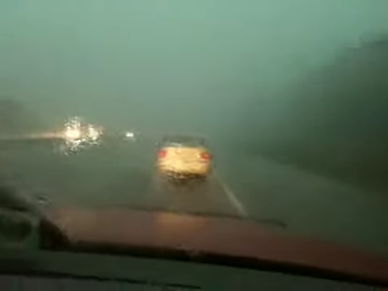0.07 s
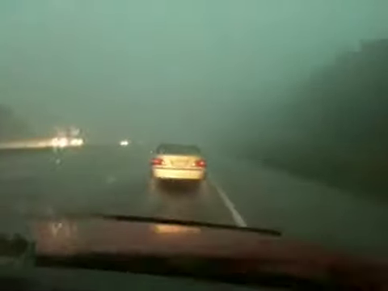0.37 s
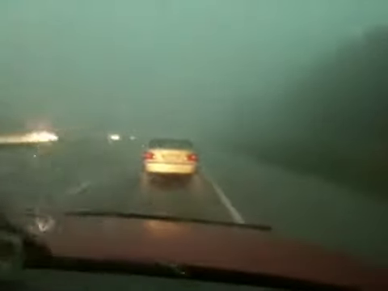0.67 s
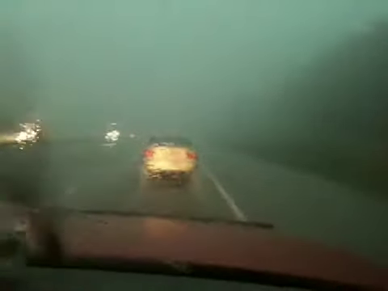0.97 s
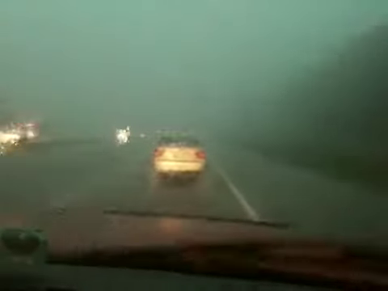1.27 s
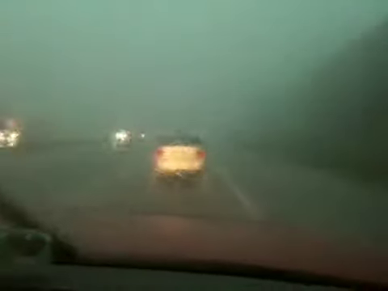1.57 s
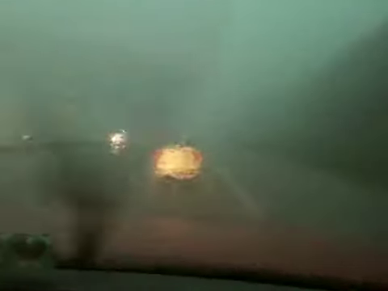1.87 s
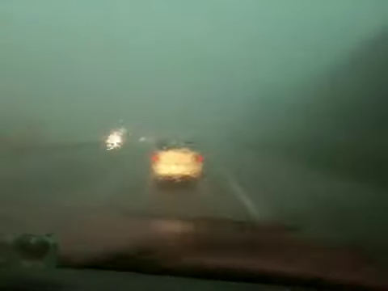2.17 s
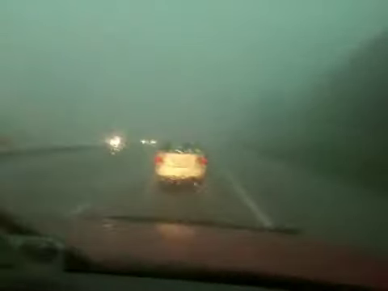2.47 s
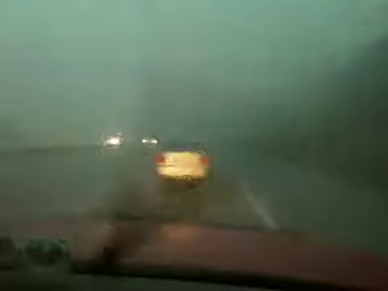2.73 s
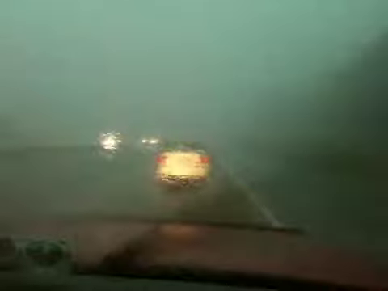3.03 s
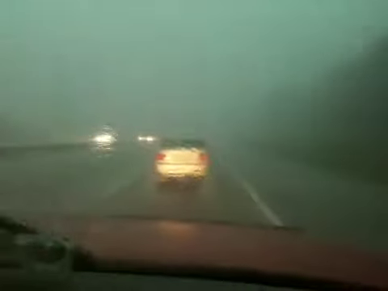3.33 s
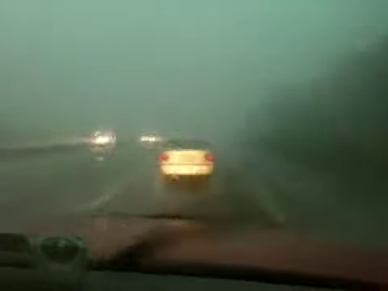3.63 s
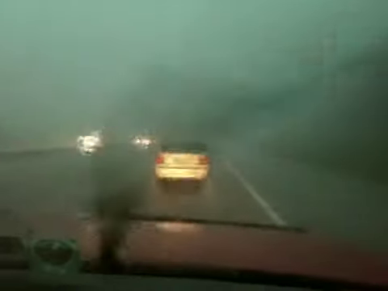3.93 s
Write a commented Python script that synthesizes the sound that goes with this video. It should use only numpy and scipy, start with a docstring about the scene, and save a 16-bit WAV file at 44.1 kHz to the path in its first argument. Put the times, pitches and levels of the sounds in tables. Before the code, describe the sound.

Windshield wipers clack loudly inside a moving car at about 0.4, 1.3, 2.1, 3.0 and 3.8 seconds. Each clack comes with a hollow thump and a brief shudder of dull knocks, then a faint bump half a second later. Quieter rain hisses and patters on the glass and body throughout, swelling and easing, with a few bigger drops ticking. A low rumble of tires and wind runs underneath.

```python
"""Windscreen wipers clack every 0.84 s, heard inside a car driving through a downpour.
The cause is backlash: at the bottom of each sweep the loose linkage takes up its slack in an impact,
the cowl booms in its resonant modes and the blades shudder back; at the top they turn with a faint bump.
Rain, a mass of random impacts, hisses and ticks on the glass and patters on the body.
Underneath, tyres and wind send a low rumble through the body."""
import sys
import numpy as np
from scipy import signal
from scipy.fft import rfft, irfft
from scipy.io import wavfile
from scipy.ndimage import uniform_filter1d

SR = 44100
rng = np.random.default_rng(int(sys.argv[2]) if len(sys.argv) > 2 else 0)


def int16_out(signal):
    """Quantize to a 16-bit WAV file."""
    q = np.round(np.clip(np.atleast_2d(signal).T, -1, 1) * 32767)
    wavfile.write(sys.argv[1], SR, q.astype(np.int16))


N = 176400

# Wiper strokes, timed at the clack: start_s, level_db
STROKE_TIMES = [(-.39, 0), (0.4483, 1.5), (1.2875, 2), (2.1279, 1.5), (2.9653, 1.5), (3.804, 1)]
def wipers():
    """Superposition: the impacts, friction and resonances of each stroke add up."""
    return linkage() + scrape() + clack() + housing() + cowl() + blades()


# Knocks around each clack, the last two at the top of the sweep: offset_s, level_db, bass_db, treble_db
KNOCK_PATTERN = [(-.0185, -4.5, 6, -12.5), (-.0115, 0, 5.5, 6), (-.0075, 1, -8, -2.5), (.002, -3, 3, 2),
                 (.014, -6, -2, 2), (0.0251, -5.5, -2.5, -13), (0.0347, -3, 4, 0), (0.046, -12, 6, 4.5),
                 (0.0619, -3, -8, -1.5), (.071, -7, 8, 3), (.082, -7, -4.5, -11), (.120, -8.5, 4, -22),
                 (.137, -5.5, -2, 0), (.1445, -2.5, -4.5, -18), (.156, -11, 4, -9), (0.197, -10, -3, -14),
                 (.206, -6, -5, -13), (.281, -7.5, -4, -5), (.292, -10, -2, 6.5), (.535, -12.5, -3, -15),
                 (0.548, -16, 1, -5)]
# Spectrum of a knock: frequency_hz, level_db
KNOCK_SPECTRUM = [(30, -36), (70, -26), (110, -2.5), (160, 0), (210, -5.5), (290, 3), (360, -1.5),
                  (530, 1.5), (680, -2), (850, -12), (1100, -13.5), (1600, -8), (2000, -13), (3000, -26),
                  (5000, -31), (9000, -41), (14000, -60)]
def linkage(level_db=20.5, variation=0.41):
    """Repeated impact: the arms reverse and the blades shudder in dull knocks, alike at each stroke."""
    out = np.zeros(N)
    for offset_s, knock_db, bass_db, treble_db in KNOCK_PATTERN:
        common = knock_ring()
        for start_s, stroke_db in STROKE_TIMES:
            ring = np.sqrt(1 - variation ** 2) * common + variation * knock_ring()
            knock = colour(ring, KNOCK_SPECTRUM, bass_db, treble_db)
            add(out, start_s + offset_s, amp(level_db + knock_db + stroke_db) * knock)
    return out


# Decay of a knock by band: frequency_hz, t60_s
KNOCK_DECAY = [(100, 0.093), (500, 0.0683), (1500, 0.064), (8000, 0.055)]
def knock_ring():
    """Frequency-dependent damping: the higher bands of a knock die sooner."""
    spectra = [rfft(burst(t60_s)) for _, t60_s in KNOCK_DECAY]
    hz = np.linspace(0, SR / 2, len(spectra[0]))
    centres = [centre for centre, _ in KNOCK_DECAY]
    nearness = [log_interp([(f, float(f == centre)) for f in centres], hz) for centre in centres]
    bands = [spectrum * (near == np.max(nearness, 0)) for spectrum, near in zip(spectra, nearness)]
    return irfft(sum(bands))[:len(hz)]


# The clack and its two reflections: offset_s, level_db
CLACK_REFLECTIONS = [(0, 1.5), (.0037, -11), (.0095, -8)]
# Spectrum of the clack and the scrape: frequency_hz, level_db
CLACK_SPECTRUM = [(30, -21), (80, -17), (160, -13), (210, -10), (300, -2), (450, -0.5), (700, -1.5),
                  (1100, -9), (1700, -3), (2250, -5.5), (2700, 0.5), (3300, -4.5), (4500, -4), (5400, -9.5),
                  (7800, -6), (10500, -14), (13000, -26.5), (16000, -50)]
def clack(level_db=13.5, tail_db=-4.5):
    """Backlash: the slack closes with a hard crack, echoed twice off the cabin; reflections add a tail."""
    out = np.zeros(N)
    for offset_s, impact_db in CLACK_REFLECTIONS:
        crack = burst(t60_s=0.014)
        for start_s, stroke_db in STROKE_TIMES:
            tail = amp(tail_db) * burst(t60_s=0.062)
            impact = colour(crack + tail, CLACK_SPECTRUM)
            add(out, start_s + offset_s, amp(level_db + impact_db + stroke_db) * impact)
    return out


def scrape(length_s=0.015, level_db=-22, rise_db=7):
    """Sliding friction: the loose joint rasps through its slack, growing louder up to the clack."""
    out = np.zeros(N)
    progress = np.arange(SR // 20) / SR / length_s
    swell = (progress < 1) * amp(rise_db * (np.minimum(progress, 1) - 1.5))
    for start_s, stroke_db in STROKE_TIMES:
        rasp = colour(rng.standard_normal(len(swell)) * swell, CLACK_SPECTRUM)
        add(out, start_s - length_s, amp(level_db + stroke_db) * rasp)
    return out


# Modes of the linkage housing: pitch_hz, level_db, t60_s
HOUSING_MODES = [(1573, -22.5, 0.052), (1933, -19.5, 0.055), (2135, -24, 0.06), (2595, -20, 0.047),
                 (2770, -31, 0.053)]
def housing():
    """Impulse response: the clack rings the hollow housing."""
    return stroke_resonance(HOUSING_MODES, offset_s=0, rise_s=0.00044)


# Modes of cowl and cabin: pitch_hz, level_db, t60_s
COWL_MODES = [(161.1, -18.5, 0.39), (247, -19, 0.21), (288, -21.5, 0.21), (495, -26.5, 0.16),
              (609, -29.5, 0.33), (780, -35, 0.35), (1540, -40, 0.28), (1990, -28.5, 0.13),
              (2550, -46, .12)]
def cowl():
    """Resonance: the reversal at the bottom of the sweep sets cowl and cabin booming."""
    return stroke_resonance(COWL_MODES, offset_s=-0.012, rise_s=0.012)


# Modes of the wiper arms: pitch_hz, level_db, t60_s
ARM_MODES = [(372, -26, 0.12), (436.5, -30, 0.14), (522, -21, 0.11), (627, -31.5, 0.091),
             (805, -29.5, 0.16), (915, -30.5, 0.13), (1248, -26.5, 0.08), (1580, -38, .12)]
def blades():
    """Free vibration: the arms ring as the blades flop over to start back up."""
    return stroke_resonance(ARM_MODES, offset_s=0.1395, rise_s=0.0042)


# Strength of the rain: time_s, hiss_db, patter_db
RAIN_STRENGTH = [(0, -37, -32.5), (0.141, -40, -35), (.38, -50.5, -42), (.6, -53.5, -46.5),
                 (.74, -39, -37.5), (.98, -42, -39), (1.12, -39, -34.5), (1.42, -41.5, -38),
                 (1.72, -35, -32), (1.96, -39.5, -36.5), (2.1, -39.5, -37), (2.56, -43, -39),
                 (2.92, -38, -35), (3.1, -41, -37), (3.36, -47.5, -42), (3.56, -41, -37.5),
                 (3.76, -45, -40), (4, -44.5, -38.5)]
# Spectrum of rain on the glass: frequency_hz, level_db
GLASS_SPECTRUM = [(1000, -17.5), (2200, -0.5), (3300, 1), (4200, -1.5), (5100, -4), (6000, 0), (6800, 2),
                  (8000, -1), (10300, -2), (12000, -7.5), (14000, -19), (15800, -59)]
# Spectrum of rain on the body: frequency_hz, level_db
BODY_SPECTRUM = [(200, -19.5), (500, -0.5), (650, 4), (800, -2), (1050, -0.5), (1250, 1), (1580, 2.5),
                 (2100, 0), (2600, -6.5), (4000, -12.5), (9000, -37)]
# Single big drops on the glass: start_s, level_db
BIG_DROPS = [(.160, -5), (0.264, -5), (0.492, -5), (.558, -2.5), (.613, -9), (.961, -6), (1.0368, -3.5),
             (1.0848, -1), (2.343, -4), (2.715, -5), (3.122, -4)]
def rain(noise_db=1, ticks_db=-6.5, splats_db=-2.5):
    """Incoherent addition: impacts merge into noise that swells and eases; a few big drops stand out."""
    time_s, hiss_db, patter_db = np.transpose(RAIN_STRENGTH)
    t = np.arange(N) / SR
    hiss = amp(noise_db) * drifting_noise(GLASS_SPECTRUM, patch_db=1.2, flicker_db=1.5)
    glass = hiss + amp(ticks_db) * small_drops()
    body = amp(noise_db) * drifting_noise(BODY_SPECTRUM, patch_db=1.2, flicker_db=0.5)
    out = glass * amp(np.interp(t, time_s, hiss_db)) + body * amp(np.interp(t, time_s, patter_db))
    for start_s, drop_db in BIG_DROPS:
        add(out, start_s, amp(splats_db + drop_db) * colour(burst(t60_s=0.029), GLASS_SPECTRUM))
    return out


def small_drops(spots=16, drops_per_s=1000, spread_db=5):
    """Shot noise: drops tick at random times, each spot of the glass with its own ring."""
    out = np.zeros(N)
    for _ in range(spots):
        sizes = amp(spread_db * np.minimum(rng.exponential(1, N), 4.5))
        hits = sizes * (rng.random(N) < drops_per_s / spots / SR)
        out += signal.oaconvolve(hits, burst(t60_s=0.0103))[:N]
    return unit_rms(colour(out, GLASS_SPECTRUM))


# Spectrum of the road rumble: frequency_hz, level_db
ROAD_SPECTRUM = [(20, -38), (50, -37), (70, -19), (88, -8), (110, -7), (155, 1), (215, -4.5), (280, -2),
                 (340, -6.5), (420, -3.5), (500, -18), (640, -4), (780, -16), (2000, -26), (8000, -60)]
def road(level_db=-37.5):
    """Sound transmission: tyres and wind rumble through the body."""
    return amp(level_db) * drifting_noise(ROAD_SPECTRUM, patch_db=0.75, flicker_db=1.54)


def stroke_resonance(modes, offset_s, rise_s):
    """Modal synthesis: a sum of damped sines swells and rings out once in every stroke."""
    out, t = np.zeros(N), np.arange(SR // 2) / SR
    ring = sum(amp(db) * decay(t, t60_s) * np.sin(2 * np.pi * hz * t + rng.uniform(0, 2 * np.pi))
               for hz, db, t60_s in modes)
    attack = 1 - np.exp(-t / rise_s)
    for start_s, stroke_db in STROKE_TIMES:
        add(out, start_s + offset_s, amp(stroke_db) * ring * attack)
    return out


def burst(t60_s, size=8192, passes=4):
    """Modal overlap: a struck panel rings as dying noise, here with an even spectrum and energy 1."""
    t = np.arange(size) / SR
    gate = np.arange(size) < min(t60_s * SR, size / 2)
    ring = rng.standard_normal(size) * decay(t, t60_s)
    for _ in range(passes):
        spectrum = rfft(ring)
        whitened = irfft(spectrum / (abs(spectrum) + 1e-12))
        ring = whitened * decay(t, 10 * t60_s) * gate
    return ring / np.linalg.norm(ring)


def drifting_noise(spectrum, patch_db, flicker_db, size=512):
    """Amplitude modulation: patches of a noise spectrum drift while all bands flicker together."""
    hop = size // 4
    frames, bins = N // hop + 8, size // 2 + 1
    real, imag, patches = rng.standard_normal((3, frames, bins))
    patches = uniform_filter1d(patches, size=24, axis=0)
    patches = unit_rms(uniform_filter1d(patches, size=8, axis=1))
    flicker = unit_rms(uniform_filter1d(rng.standard_normal(frames), size=5))[:, None]
    spectrogram = (real + 1j * imag) * amp(patch_db * patches + flicker_db * flicker)
    noise = signal.istft(spectrogram.T, nperseg=size, noverlap=size - hop)[1]
    return unit_rms(colour(noise, spectrum)[-N:])


def colour(x, spectrum, bass_db=0, treble_db=0, bass_hz=288, treble_hz=1480, size=4096):
    """Minimum-phase filter: imposes a spectrum, with bass and treble shelves."""
    hz = abs(np.fft.fftfreq(size, 1 / SR))
    bass = bass_db / (1 + (hz / bass_hz) ** 4)
    treble = treble_db * (1 - 1 / (1 + (hz / treble_hz) ** 4))
    log_gain = np.log(amp(log_interp(spectrum, hz) + bass + treble))
    response = np.exp(np.conj(signal.hilbert(log_gain)))
    taps = np.fft.ifft(response).real[:size // 2]
    return signal.fftconvolve(x, taps)[:len(x)]


def log_interp(points, hz):
    """Interpolation on a log-frequency axis."""
    point_hz, value = np.transpose(points)
    return np.interp(np.log(hz + 1), np.log(point_hz + 1), value)


def decay(t, t60_s):
    """Exponential decay: 60 dB in t60_s."""
    return np.exp(-np.log(1000) * t / t60_s)


def amp(db):
    """Decibels to amplitude ratio."""
    return 10 ** (np.asarray(db) / 20)


def unit_rms(x):
    """Normalisation to rms 1."""
    return x / np.sqrt(np.mean(x ** 2) + 1e-20)


def add(mix, start_s, sound):
    """Delay and sum: mixes a sound in at start_s."""
    at = round(start_s * SR)
    sound = sound[max(-at, 0):]
    part = mix[max(at, 0):][:len(sound)]
    part += sound[:len(part)]


def scene():
    """Superposition: wipers, rain and road add at one point behind the windscreen."""
    return (wipers() + rain() + road())[None]


def record(dry, ceiling=1.4, cutoff_hz=15800):
    """Saturation: the microphone rounds off the highest peaks; a low-pass then limits the band."""
    soft = ceiling * np.tanh(dry / ceiling)
    lowpass = signal.firwin(511, cutoff_hz, window=("kaiser", 9), fs=SR)
    return signal.oaconvolve(soft, lowpass[None], "same")


dry = scene()
out = record(dry)
int16_out(out)
```